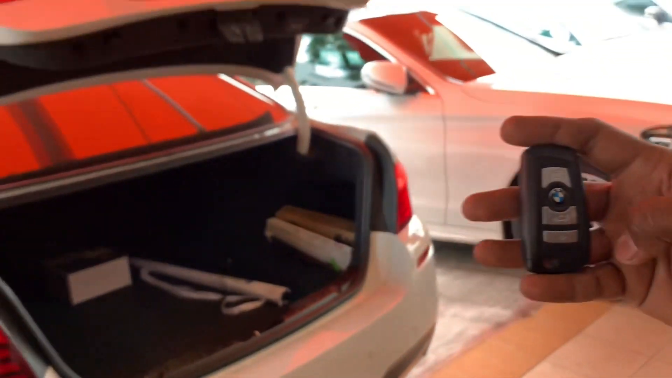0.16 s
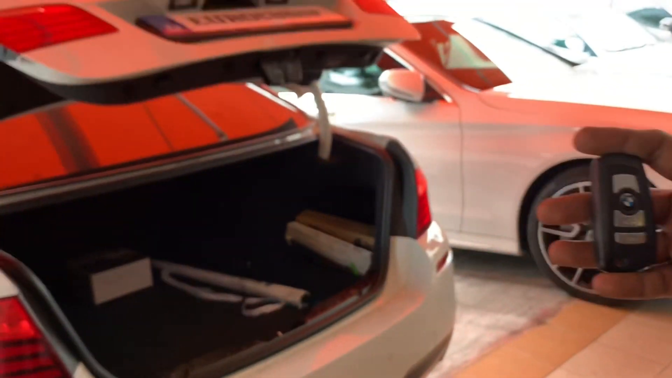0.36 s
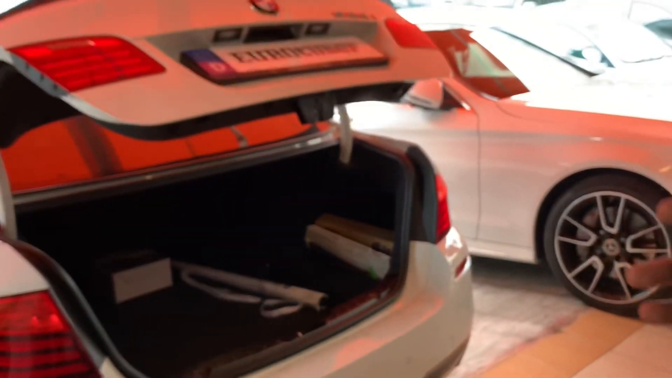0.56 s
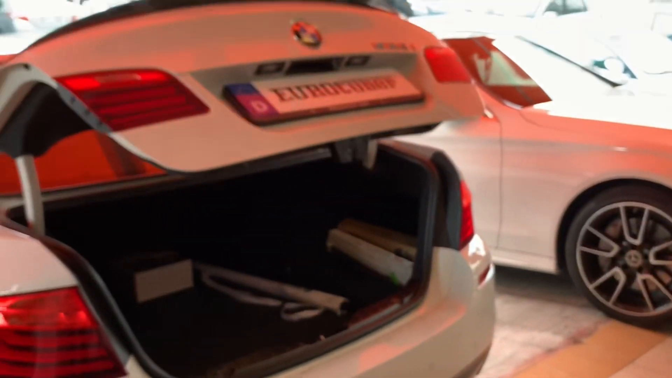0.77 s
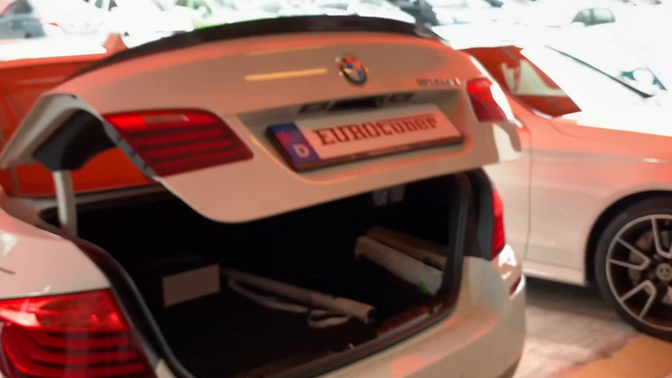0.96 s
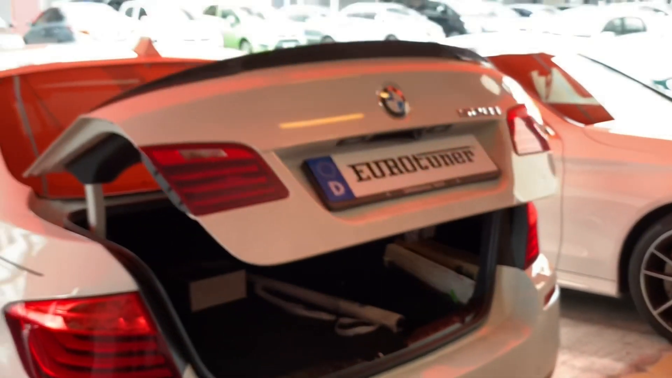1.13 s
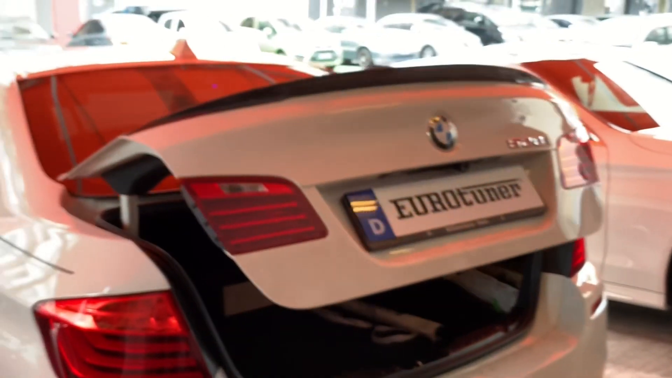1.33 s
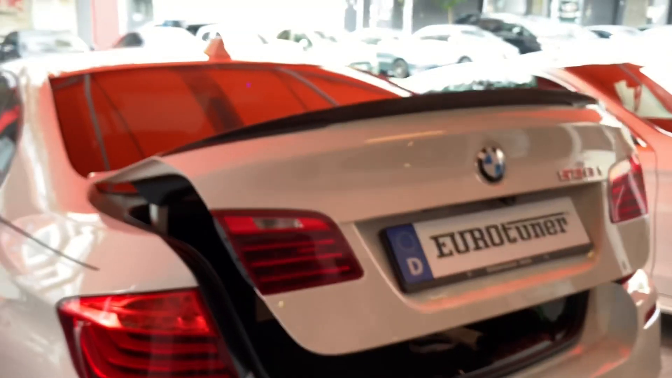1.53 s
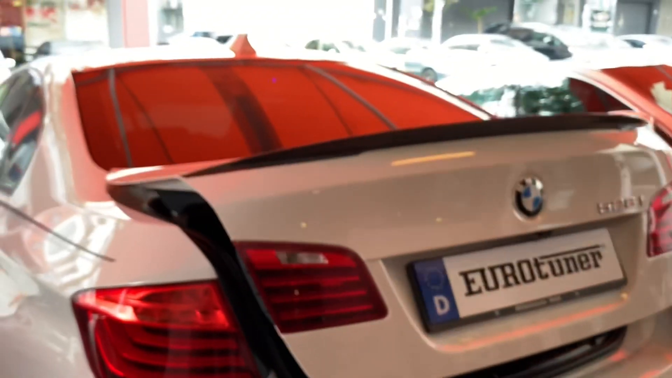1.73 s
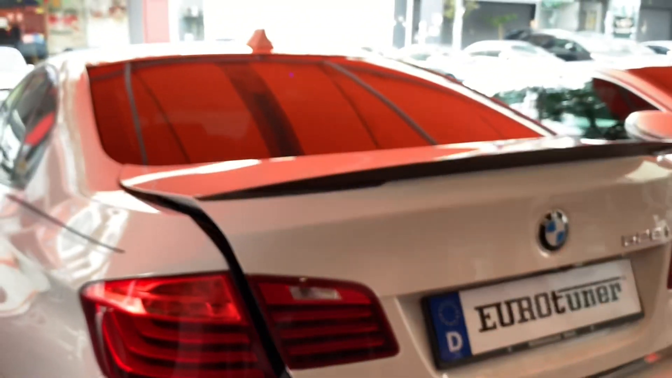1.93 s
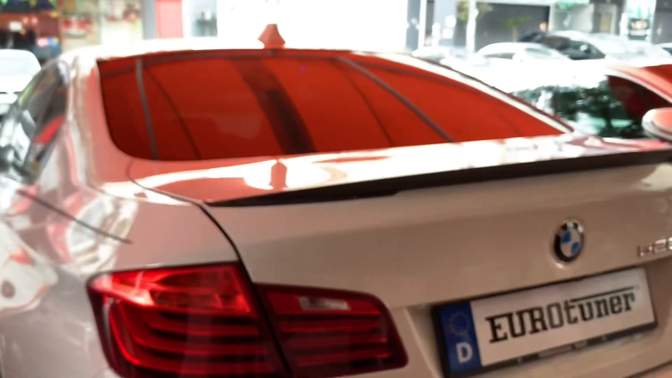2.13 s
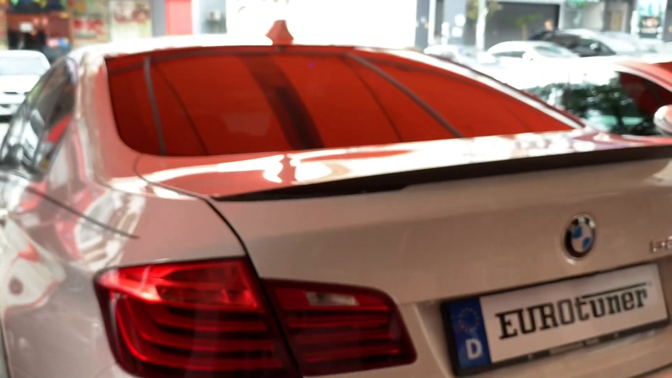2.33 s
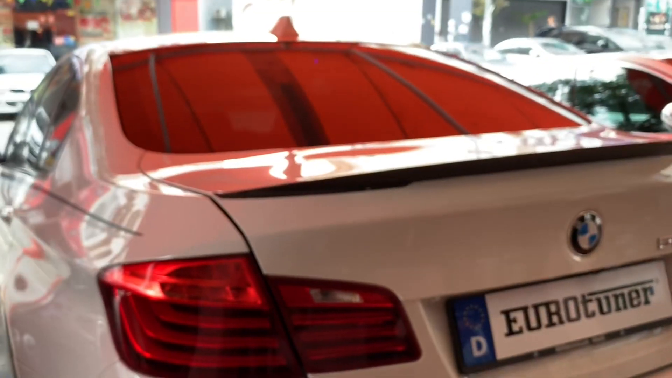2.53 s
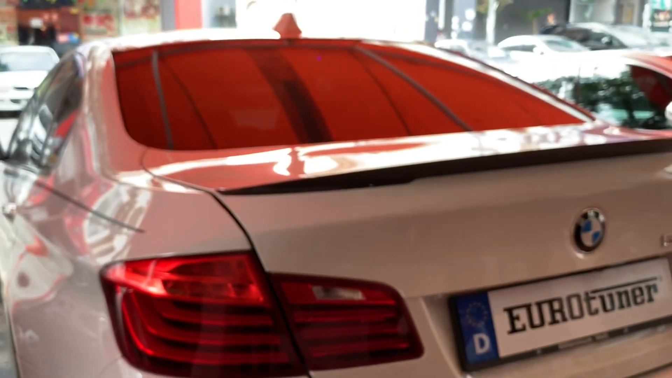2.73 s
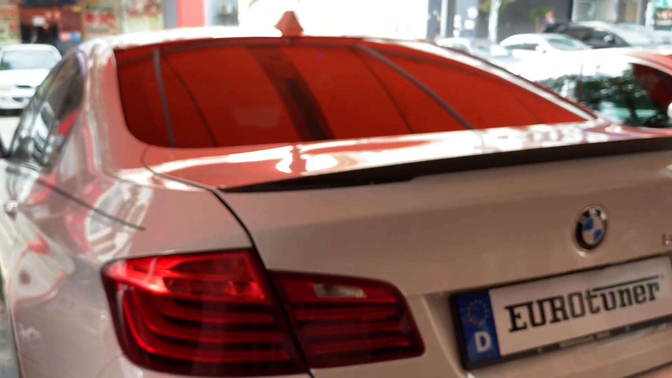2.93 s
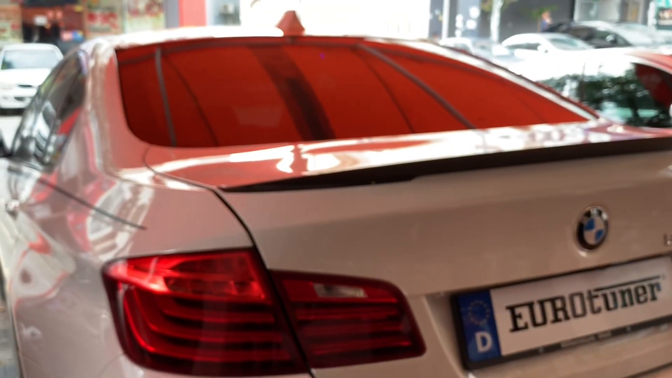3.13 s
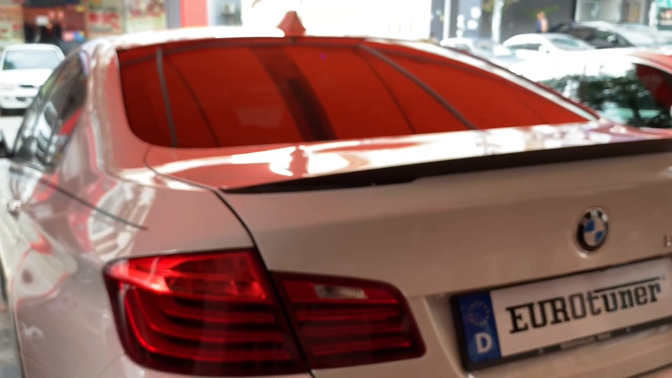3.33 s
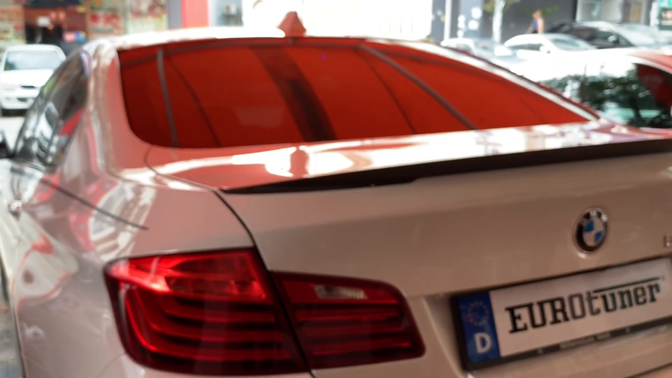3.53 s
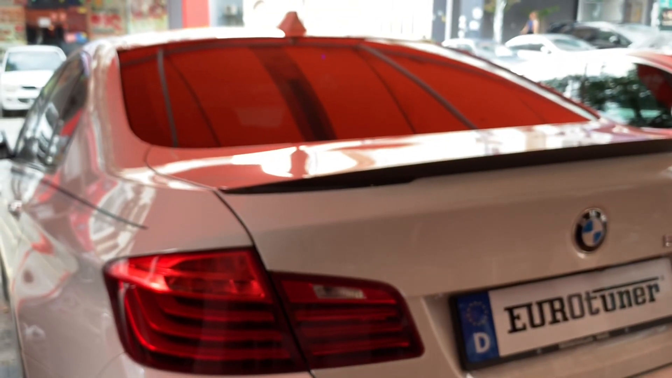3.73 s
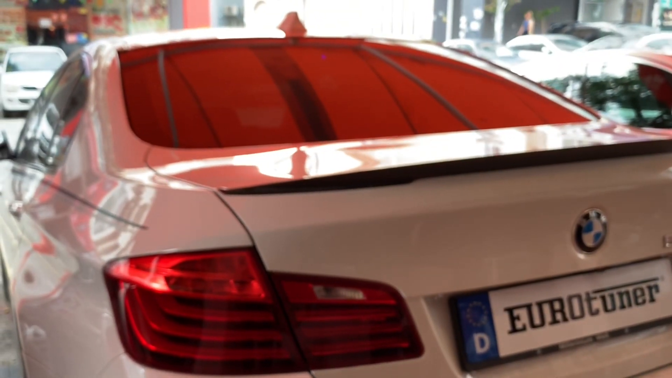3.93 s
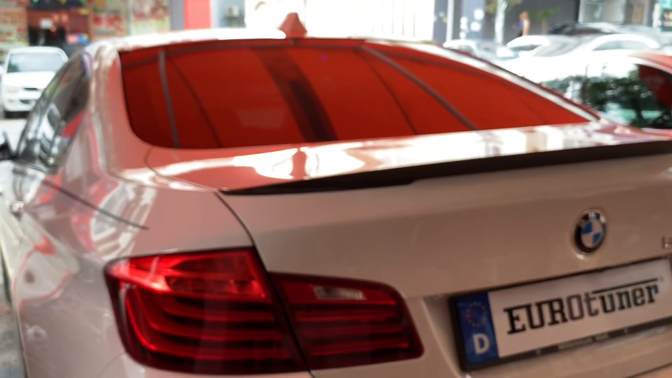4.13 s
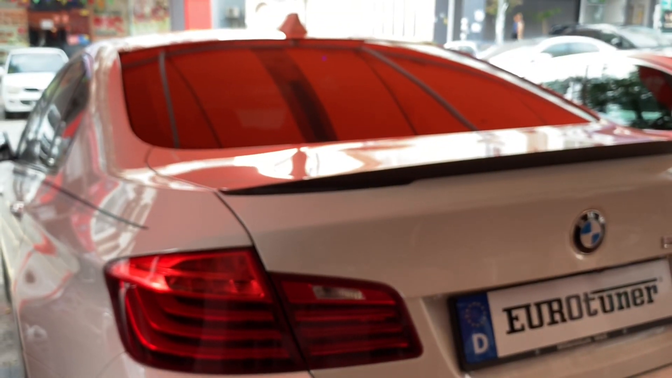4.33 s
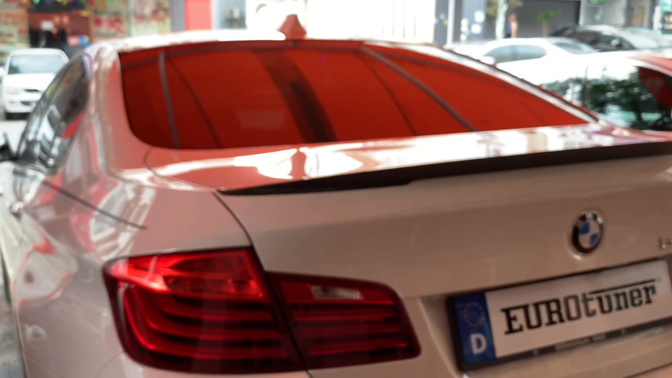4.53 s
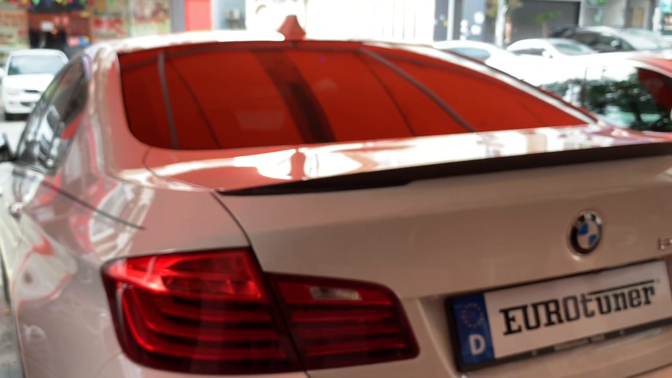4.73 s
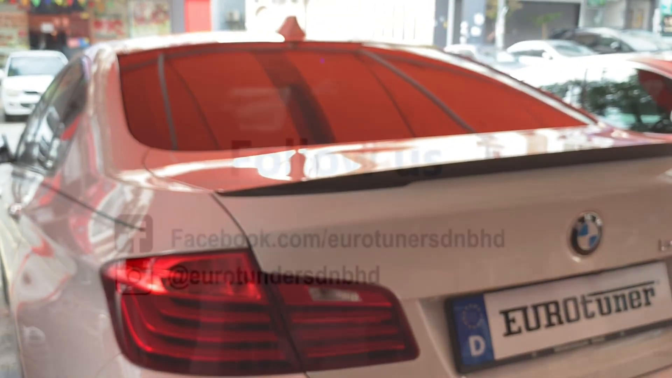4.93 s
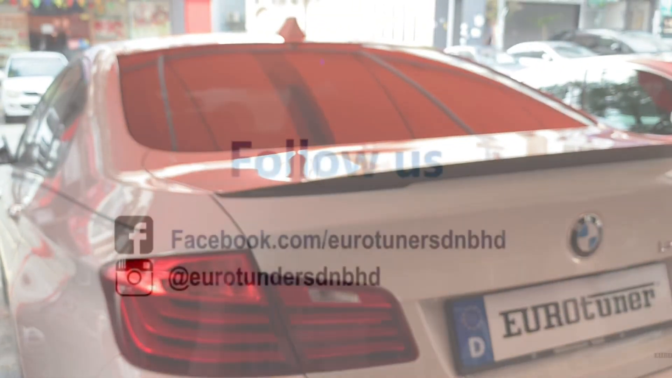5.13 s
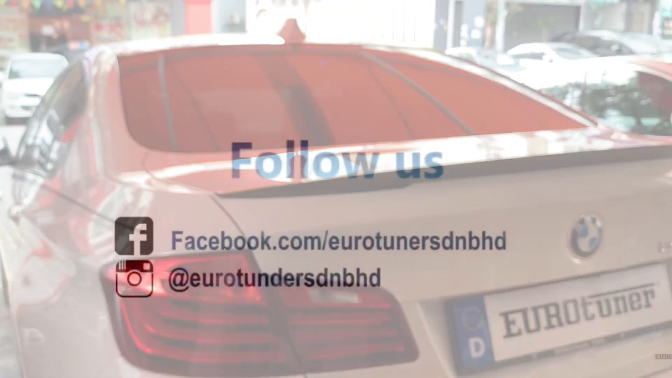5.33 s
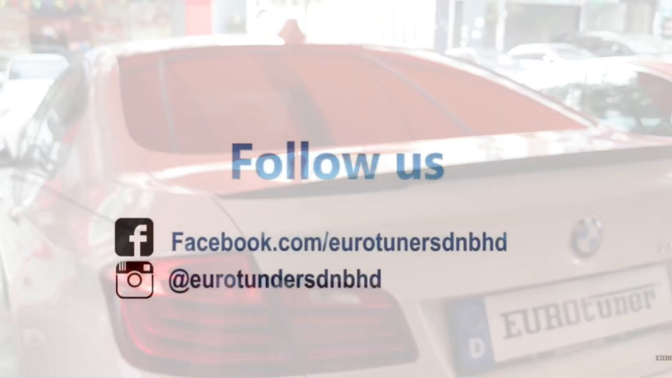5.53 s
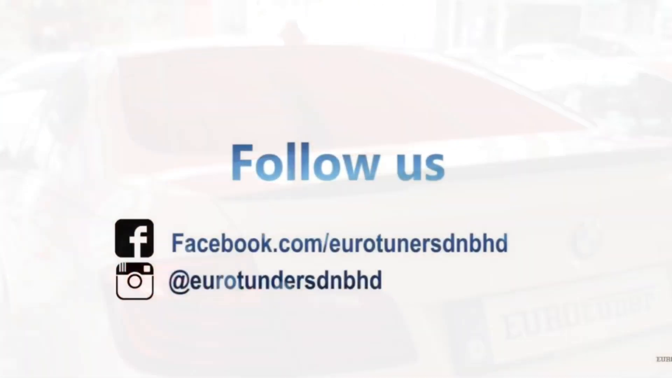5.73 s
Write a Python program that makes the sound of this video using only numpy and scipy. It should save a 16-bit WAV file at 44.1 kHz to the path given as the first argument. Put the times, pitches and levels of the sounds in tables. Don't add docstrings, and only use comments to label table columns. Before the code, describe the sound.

Close stereo pickup of a car boot closing in a reverberant workshop. Faint puffs of air come first, then a quick cluster of steel clicks and panel knocks lands with a dull, heavy body thud. Underneath throughout are a wavering low hum, faint motor whine, broad airy roar and far traffic swelling past, fading at the end.

```python
import sys
import numpy as np
from scipy import signal
from scipy.fft import rfft, irfft, next_fast_len
from scipy.io import wavfile
from scipy.ndimage import uniform_filter1d

SR = 44100
rng = np.random.default_rng(int(sys.argv[2]) if len(sys.argv) > 2 else 0)


def voltage_ratio(level):
    return 10 ** (np.asarray(level, float) / 20)


def output_pcm(signal):
    pcm = np.clip(np.atleast_2d(signal).T, -1, 1) * 32767
    wavfile.write(sys.argv[1], SR, np.round(pcm).astype(np.int16))


N = 255339


def evened(x):
    return x / np.sqrt(np.mean(x ** 2) + 1e-20)


def read(points, hz):
    f, value = np.transpose(points)
    return np.interp(np.log(hz + 1), np.log(f + 1), value)


def follow(curve):
    return np.interp(np.arange(N) / SR, *np.transpose(curve))


def colour(x, gain):
    size = next_fast_len(N + 4096)
    hz = np.fft.rfftfreq(size, 1 / SR)
    return irfft(rfft(x, size) * gain(hz), size)[..., :N]


def resonate(x, hz, width):
    turn = np.exp(2j * np.pi * hz * np.arange(x.shape[-1]) / SR)
    r = np.exp(-np.pi * width / SR)
    smooth = signal.lfilter([1 - r], [1, -r], x / turn)
    return 2 * (turn * smooth).real


def resonate_twice(x, hz, width):
    return resonate(resonate(x, hz, width), hz, width)


def ring(modes, seconds):
    t = np.arange(round(seconds * SR)) / SR
    return sum(voltage_ratio(db - 60 * t / t60) * np.sin(2 * np.pi * hz * t) for hz, db, t60 in modes)


def add(mix, s, sound):
    start = round(s * SR)
    mix[..., start:start + sound.shape[-1]] += sound


def swells(rows):
    t = np.arange(N) / SR
    total = np.zeros(N)
    for s, db, rise, fall in rows:
        total += voltage_ratio(db) * np.exp(-.5 * ((t - s) / np.where(t < s, rise, fall)) ** 2)
    return total


PORT_LAG = 9.65
BEND_HZ, TREBLE_APART = 7400, 0.3


def late(x, lag):
    def delay(hz):
        return np.exp(-2j * np.pi * hz * np.where(hz > BEND_HZ, PORT_LAG, lag) / SR)
    return np.array([colour(x[0], delay), x[1]])


# t/s, crack level/dB, centre f/Hz, t60/s, panel blow level/dB
CONTACTS = [(2.055, -41, 1930, 0.26, -49), (2.0615, -38, 4600, 0.094, -38), (2.059, -62, 5400, .15, -68),
            (2.072, -42, 1800, .1, -45), (2.07, -42, 3800, 0.066, -53), (2.066, -34, 910, 0.099, -38),
            (2.0973, -36, 8700, 0.04, -46), (2.0965, -44, 13100, 0.03, -62),
            (2.098, -38.5, 3300, 0.14, -38), (2.099, -32.5, 920, 0.15, -32),
            (2.098, -43.5, 6800, 0.089, -60), (2.112, -37, 1600, 0.094, -45), (2.122, -34, 1100, 0.14, -41),
            (2.147, -44, 9600, 0.11, -58), (2.148, -36, 990, 0.27, -43), (2.173, -56, 9550, 0.14, -65),
            (2.19, -67, 13100, 0.39, -70), (2.1361, -38.5, 9700, 0.093, -37),
            (2.1365, -49, 14000, 0.084, -63), (2.137, -43, 1700, 0.11, -34.5), (2.145, -36, 500, 0.43, -40),
            (2.153, -45, 3900, 0.19, -43), (2.176, -41, 1260, 0.18, -37), (2.19, -42.5, 1200, 0.34, -54),
            (2.217, -42, 850, 0.14, -57), (2.076, -38, 930, 0.14, -48), (2.125, -50, 2500, .25, -48),
            (2.2, -37.5, 300, 0.29, -53), (2.050, -47, 2300, 0.22, -55), (2.178, -45, 1800, .2, -48),
            (4.365, -55, 2650, .12, -80), (4.382, -53, 2400, .06, -80)]
# f/Hz, level/dB, t60/s
PANEL = [(348, -5, 0.08), (430, 0, 0.063), (565, -5, 0.045), (706, 0.5, 0.045), (837, -1, .05),
         (980, -1.5, 0.063), (1090, -2, .04), (1200, -13, 0.031), (1440, -3.5, .05), (1710, -9, 0.035),
         (2080, -18, .03)]
CRACK_WIDTH, WIDEST_HZ = 0.76, 3250
APART_HZ = 2500


def contacts():
    cracks, blows = np.zeros((2, N)), np.zeros((2, N))
    t = np.arange(12000) / SR
    for s, crack_db, hz, t60, blow_db in CONTACTS:
        width = min(CRACK_WIDTH * hz, WIDEST_HZ)
        apart = min(hz / APART_HZ, 0.9) if hz < BEND_HZ else TREBLE_APART
        a, b, c, d, grit = rng.standard_normal((5, len(t)))
        grit = voltage_ratio(2.0 * evened(uniform_filter1d(grit, 60)))
        band = resonate_twice(grit * np.array([a + apart * b, a - apart * b]), hz, width)
        envelope = voltage_ratio(crack_db - 60 * t / t60) * np.minimum(t / 0.001, 1)
        add(cracks, s, envelope * evened(band))
        rattle = np.array([c + 0.41 * d, c - 0.22 * d]) * voltage_ratio(-60 * t / 0.035)
        add(blows, s, voltage_ratio(blow_db) * rattle / np.linalg.norm(rattle[0]))
    return cracks + signal.fftconvolve(blows, ring(PANEL, .3)[None], axes=1)[:, :N]


# t/s, level/dB
CATCHES = [
    (2.0585, -36.5),
    (2.062, -35.5),
    (2.0641, -35),
    (2.067, -37),
    (2.074, -37),
    (2.0985, -38),
    (2.104, -42),
    (2.140, -49),
]
# f/Hz, level/dB, t60/s
LATCH = [(2080, 0, .03), (2900, -4, .015), (3250, -4, .014), (3700, -4, .018), (4250, -3, .018),
         (5000, -6, .012), (6600, -14, .012)]


def latch():
    scrapes, t = np.zeros((2, N)), np.arange(400) / SR
    for s, db in CATCHES:
        a, b = rng.standard_normal((2, len(t))) * voltage_ratio(-60 * t / 0.0071)
        add(scrapes, s, voltage_ratio(db) * np.array([a + .8 * b, a - .8 * b]) / np.linalg.norm(a))
    scrapes = 1.5 * uniform_filter1d(scrapes, size=4, axis=1)
    return signal.fftconvolve(scrapes, ring(LATCH, .15)[None], axes=1)[:, :N]


# t/s, level/dB, f/Hz, t60/s
KNOCKS = [(2.0625, -25.5, 3900, 0.016), (2.064, -36, 2080, 0.085), (2.066, -27, 980, 0.027),
          (2.066, -39, 3300, .025), (2.070, -27, 200, 0.092), (2.0975, -33, 9200, .012),
          (2.0975, -40, 7700, .012), (2.0985, -29, 1090, 0.041), (2.0985, -42, 2200, .02),
          (2.0975, -42, 12800, 0.013), (2.102, -28.5, 743, 0.069), (2.101, -32, 600, .05),
          (2.104, -22, 200, 0.05), (2.1035, -28, 1070, .04), (2.109, -36, 1080, .05),
          (2.112, -30, 1490, 0.029), (2.114, -36, 900, 0.033), (2.139, -39, 1450, 0.055),
          (2.1395, -36, 2090, 0.036), (2.150, -37, 860, 0.059), (2.155, -28, 438, 0.063),
          (2.1765, -33, 800, 0.034), (2.1765, -32.5, 1420, 0.12), (2.180, -24, 201, 0.13),
          (2.190, -36, 1310, .05), (2.205, -31.5, 149, 0.17), (2.212, -35, 276, .12),
          (2.201, -37, 1550, .05), (2.218, -43, 734, 0.052), (2.235, -44, 1670, .05),
          (2.255, -31, 315, .12), (2.312, -41, 700, .04)]
KNOCK_RISE_S = 0.00082


def knocks():
    out, t = np.zeros(N), np.arange(9000) / SR
    rise = np.minimum(t / KNOCK_RISE_S, 1)
    for s, db, hz, t60 in KNOCKS:
        add(out, s, rise * ring([(hz, db, t60)], len(t) / SR))
    return out


LID_LAG, LID_LEFT_DB = 3.8, 0


def boot_lid():
    return late(contacts() + latch() + knocks(), LID_LAG) * voltage_ratio([[LID_LEFT_DB], [-LID_LEFT_DB]])


# t/s, level/dB, contact/ms, direction
PUSHES = [(2.094, -24, 3.6, 1), (2.1005, -23, 3.5, -0.74), (2.111, -21, 5, 1), (2.1162, -20, 5, 1),
          (2.1225, -20.5, 4.5, -1), (2.132, -21, 2.3, -0.91), (2.143, -25, 4, 1), (2.151, -25, 4, -1),
          (2.164, -19.5, 3, -0.8), (2.170, -20.5, 2.3, 0.93), (2.199, -31, 2, -1), (2.235, -23.5, 3, -0.66),
          (2.253, -27, 4, 1), (2.270, -22.5, 5.9, -0.87), (2.296, -26, 4., 1)]
# f/Hz, level/dB, t60/s
BODY = [(84, -2, .09), (31, -12, .5), (55, -11, .4), (124, -9, .3), (183, -7, .1), (250, -8, .08),
        (330, -10, .12)]


def thump():
    force = np.zeros(N)
    for s, db, ms, direction in PUSHES:
        push = np.hanning(round(ms * SR / 1000))
        add(force, s, voltage_ratio(db) * direction * push / push.sum())
    return signal.fftconvolve(force, ring(BODY, .7))[:N] * voltage_ratio([[-.8], [.8]])


# f/Hz, t60/s
HALL = [(100, 0.17), (500, 0.45), (1500, 0.37), (5000, 0.63), (12000, 0.24)]


def hall(x):
    size = SR // 2
    taps = np.zeros((2, size))
    at = np.arange(400, size - 20, 20)
    at = at + rng.integers(0, 20, (2, len(at)))
    np.put_along_axis(taps, at, rng.choice([-1., 1.], at.shape), 1)
    hz, t, z = signal.stft(taps, SR, nperseg=256)
    tail = signal.istft(z * voltage_ratio(-60 * t / read(HALL, hz)[:, None]), SR, nperseg=256)[1]
    return signal.fftconvolve(x, tail / np.linalg.norm(tail[0]), axes=1)[:, :N]


# f/Hz, level/dB per Hz
AIR = [(500, -66), (3000, -9), (6000, -12), (8000, 9), (10000, 5), (11000, 4.5), (12000, 1), (13200, -1.5),
       (13700, -6), (14200, -12), (16000, -11)]
AIR_DB = -70
# t/s, level/dB, rise/s, fall/s
PUFFS = [(.68, -63, 0.07, 0.055), (.96, -63, 0.035, .05), (1.05, -56.5, 0.045, 0.061),
         (1.22, -69, .04, 0.044), (1.32, -60.5, 0.044, 0.034), (1.4, -60, 0.03, 0.054),
         (1.575, -53, 0.025, 0.032), (1.74, -64, 0.042, 0.037), (5.1, -67.5, 0.4, 0.29),
         (5.7, -62, 0.17, 0.33), (.5, -73, .6, 1.1), (1.13, -65, .03, .03), (2.2, -68, .08, .15)]
# f/Hz, level/dB per Hz
PUFF_COLOUR = [(500, -49), (4000, 6.5), (8000, 3), (10000, 0), (12000, 7), (13600, 2), (14300, 0),
               (15200, 4), (17000, 5)]


def hiss():
    a, b = rng.standard_normal((2, N))
    air = voltage_ratio(AIR_DB) * evened(colour(a, lambda hz: voltage_ratio(read(AIR, hz))))
    air += swells(PUFFS) * evened(colour(b, lambda hz: voltage_ratio(read(PUFF_COLOUR, hz))))
    return late(np.array([air, air]), PORT_LAG)


# t/s, level/dB
LOAD = [(0.05, -39), (0.35, -36.5), (0.43, -32), (0.8, -30.5), (1.3, -35), (1.45, -34), (1.6, -32),
        (2.06, -35), (2.4, -33), (2.9, -36), (2.98, -31.5), (3.3, -30.5), (3.87, -34), (4.14, -29.5),
        (4.4, -33), (4.66, -35), (4.9, -30.5), (5.2, -32)]
BLADE_HZ, BLADE_RAD = 94.37, -2.1
FLUTTER_DB, FLUTTER_WIDTH_HZ = -43.5, 6.3


def blade_tone():
    t = np.arange(N) / SR
    drift = 0.078 * evened(uniform_filter1d(rng.standard_normal(N), 9000))
    tone = voltage_ratio(follow(LOAD)) * np.sin(2 * np.pi * BLADE_HZ * t + BLADE_RAD + drift)
    flutter = resonate(rng.standard_normal(N), BLADE_HZ, FLUTTER_WIDTH_HZ)
    return tone + voltage_ratio(FLUTTER_DB) * evened(flutter)


MAINS_HZ, MAINS_DB, MAINS_RAD = 100.0, -45.5, 5.0


def mains_hum():
    return voltage_ratio(MAINS_DB) * np.sin(2 * np.pi * MAINS_HZ * np.arange(N) / SR + MAINS_RAD)


# t/s, level/dB
GUSTS = [(0.02, -42), (.88, -37), (1.45, -52), (1.7, -41), (2.45, -43), (3.3, -37.5), (4.0, -40),
         (4.33, -43.5), (4.75, -43), (5.45, -48), (5.65, -40)]
DUCT_HZ, DUCT_WIDTH_HZ, DUCT_DB, GUST_S = 231.2, 18.5, -50.5, 0.042


def duct_boom(noise):
    boom = evened(resonate_twice(noise, DUCT_HZ, DUCT_WIDTH_HZ))
    return boom * (voltage_ratio(DUCT_DB) + swells([(s, db, GUST_S, GUST_S) for s, db in GUSTS]))


# f/Hz, width/Hz, level/dB
WHINE = [(140.7, 7.8, -47), (237.8, 4.1, -55), (192.7, 3, -60), (288, 9.4, -68), (496, 11, -66),
         (567.4, 20, -55), (857, 7, -61), (907.6, 14, -59), (954, 8.8, -55.5), (1420, 9.2, -68.5),
         (2073, 9, -71), (3645, 12, -79), (3890, 14, -83)]


def whine(f):
    gain = 0
    for hz, width, db in WHINE:
        peak = voltage_ratio(db) * np.sqrt(2 * SR / np.pi / width)
        gain = gain + peak / (1 + (2 * (f - hz) / width) ** 2)
    return gain


# f/Hz, level/dB
WHISTLES = [(4498, -73), (4646, -69.5), (4801, -74), (4950, -71), (6108, -76), (8051, -76), (9456, -79)]
WAVER_DB = 1.1
STRAIN_DB, STRAIN_S = 3.5, 0.24


def motor_lines(noise):
    t = np.arange(N) / SR
    waver = evened(uniform_filter1d(uniform_filter1d(rng.standard_normal(N), 1200), 1200))
    level_db = WAVER_DB * waver + STRAIN_DB * np.exp(-(t / STRAIN_S) ** 2) - 1.5
    whistles = sum(voltage_ratio(db) * evened(resonate(noise[0], hz, 6)) for hz, db in WHISTLES)
    return colour(noise, whine) * voltage_ratio(level_db) + whistles * np.array([[1], [-.1]])


def fan():
    tones = np.sqrt(2) * (blade_tone() + mains_hum()) * voltage_ratio([[-1.1], [1.1]])
    noise = rng.standard_normal((2, N))
    noise[1] = 0.95 * noise[0] + 0.35 * noise[1]
    return motor_lines(noise) - tones + duct_boom(noise[0])


# f/Hz, level/dB per Hz
ROAR = [(20, -20), (45, -10), (70, -9), (120, -11), (235, -12), (320, -18), (420, -21), (600, -21),
        (1000, -26), (1700, -32.5), (2200, -37), (4700, -43), (5500, -50), (6300, -50), (7000, -52),
        (7600, -55.5), (8100, -53), (9800, -57), (10800, -90)]
ROAR_DB = -34.5
# f/Hz, correlation
SAME = [(60, 0.9), (130, 0.99), (290, 0.86), (640, 0.46), (900, .5), (1300, .1), (1800, .4), (2300, .2),
        (5200, .18), (6400, .4), (7200, .65), (7800, .5), (8300, .45), (9000, .1)]
# f/Hz, lead of the right port/rad
LEAD = [(700, 0), (1200, -.6), (1500, 2.9), (2400, 1.7), (3000, -1.6), (3500, -1), (4100, .4), (4600, .2),
        (5200, -2.8), (6300, -6.3), (7100, -9.3), (7700, -9.9), (8000, -11.8)]
# f/Hz, level/dB
LEFT_OVER_RIGHT = [(60, -3.5), (110, -0.5), (200, -0.9), (690, 1), (1300, 1), (2400, 0), (16000, -0.5)]


def roar():
    frames, hz = N // 512 + 5, np.fft.rfftfreq(2048, 1 / SR)
    a, b, c, d, patches = rng.standard_normal((frames, 1025, 5)).T
    patches = evened(uniform_filter1d(uniform_filter1d(patches, 14, 0), 8, 1))
    same = np.clip(read(SAME, hz), -1, 1)[:, None]
    lead = np.exp(1j * read(LEAD, hz))[:, None]
    left = a + 1j * b
    right = same * lead * left + np.sqrt(1 - same ** 2) * (c + 1j * d)
    tilt_db = np.multiply.outer([.5, -.5], read(LEFT_OVER_RIGHT, hz))[..., None]
    z = np.array([left, right]) * voltage_ratio(read(ROAR, hz)[:, None] + tilt_db + 1.6 * patches)
    return voltage_ratio(ROAR_DB) * evened(signal.istft(z, nperseg=2048, noverlap=1536)[1][:, :N])


# f/Hz, level/dB
RIGHT_PORT = [(7850, 0), (8050, 6), (8500, 5), (9500, 3), (10600, 0)]


def right_port(x):
    return colour(x, lambda hz: voltage_ratio(read(RIGHT_PORT, hz)))


# t/s, level/dB, half length/s
PASSES = [
    (.85, -36, 0.38),
    (2.9, -42, 0.43),
    (3.8, -37.5, 0.27),
    (4.75, -40, 0.34),
]
RUMBLE_DB = -48.5


def rumble():
    noise = rng.standard_normal(N)
    low = resonate_twice(noise, 36.0, 22) + 0.74 * resonate_twice(noise, 59.0, 4.6)
    level = voltage_ratio(RUMBLE_DB) + swells([(s, db, half, half) for s, db, half in PASSES])
    return evened(low) * level * voltage_ratio([[-.9], [.9]])


# t/s, level/dB, half length/s, centre f/Hz
TYRES = [
    (.2, -48.5, 0.19, 1320),
    (.22, -54, 0.046, 1400),
    (3.3, -48.5, 0.041, 1090),
    (4.9, -48, 0.34, 950),
]
TYRE_WIDTH_HZ = 580


def tyres():
    out = np.zeros((2, N))
    for s, db, half, hz in TYRES:
        a, b = rng.standard_normal((2, N))
        band = resonate_twice(np.array([a + 1.1 * b, a - 1.13 * b]), hz, TYRE_WIDTH_HZ)
        out += evened(band) * swells([(s, db, half, half)])
    return out


# t/s, level/dB, rise/s, fall/s
ONSET = [
    (0.0, -26, .004, .004),
]


def opening_thud():
    return swells(ONSET)


def scene():
    around = roar() + hiss()
    around[1] = right_port(around[1])
    around += rumble() + fan() + tyres() + opening_thud()
    lid = boot_lid()
    return lid + voltage_ratio(-7.0) * hall(lid) + thump() + around


# f/Hz, level/dB
MICROPHONE = [(15000, 0), (15450, -25)]


def microphone(x):
    return colour(x, lambda hz: voltage_ratio(read(MICROPHONE, hz)))


# t/s, level/dB
FADE = [(0, -0.5), (4.95, 0), (5.3, -4), (5.55, -8), (5.7, -13.5), (5.79, -18)]


def fade_out(x):
    return x * voltage_ratio(follow(FADE))


def low_pass(x):
    return signal.sosfilt(signal.butter(12, 15390, fs=SR, output="sos"), x)


def record(dry):
    return low_pass(fade_out(microphone(dry)))


dry = scene()
out = record(dry)
output_pcm(out)
```